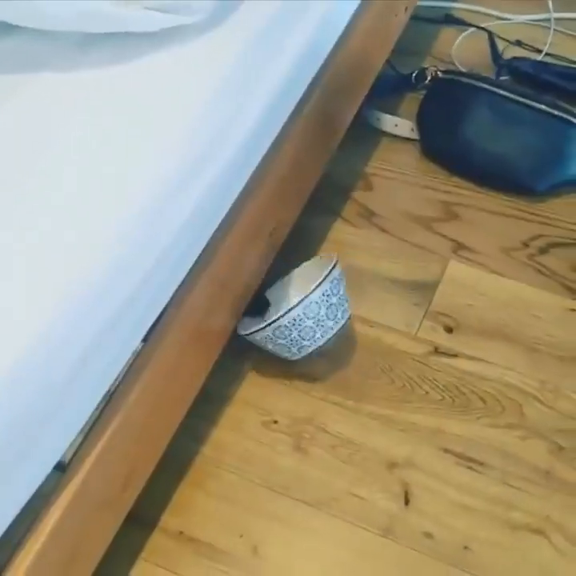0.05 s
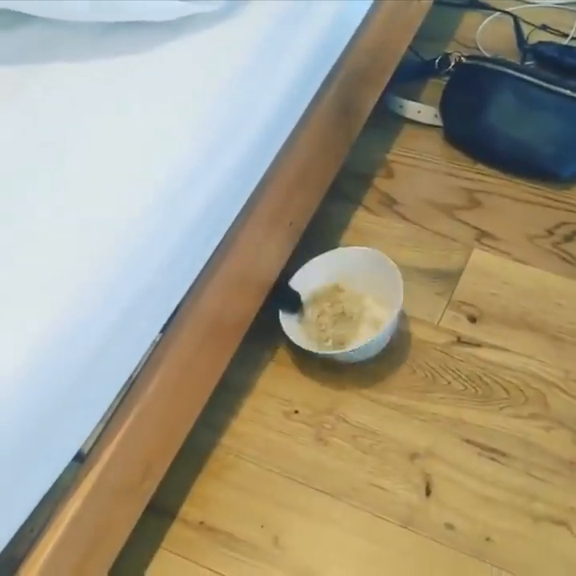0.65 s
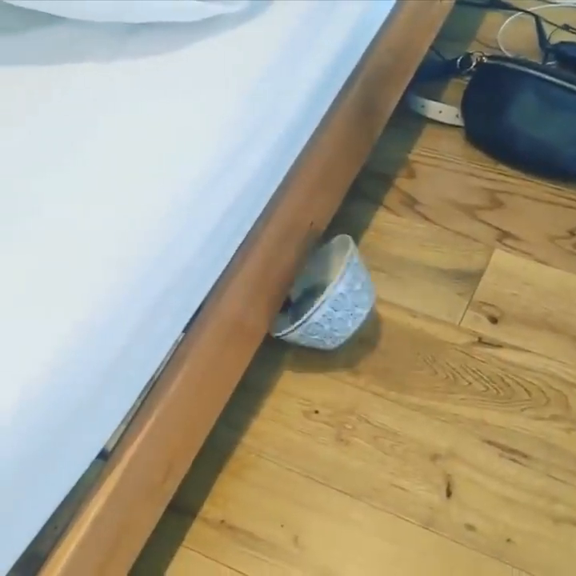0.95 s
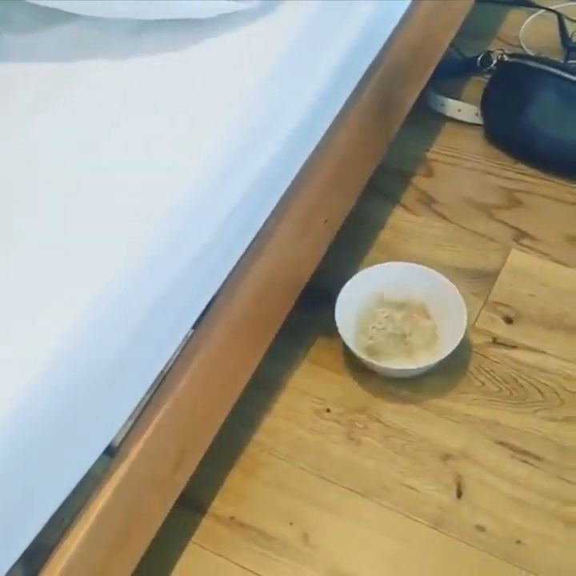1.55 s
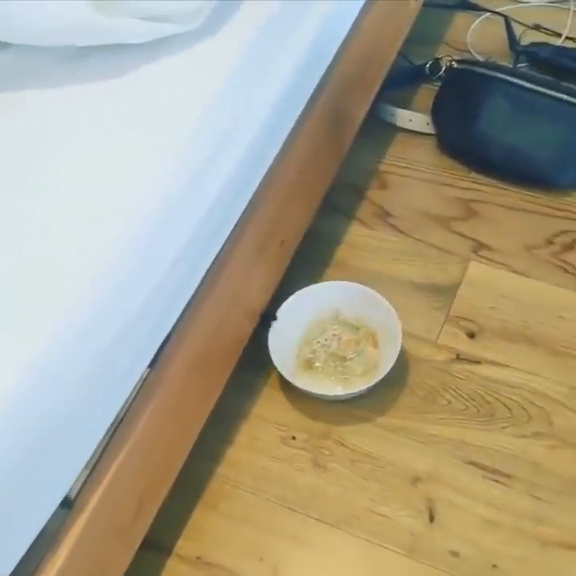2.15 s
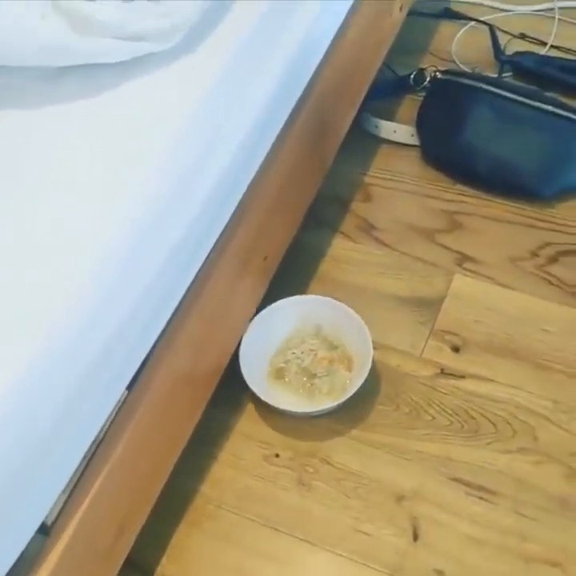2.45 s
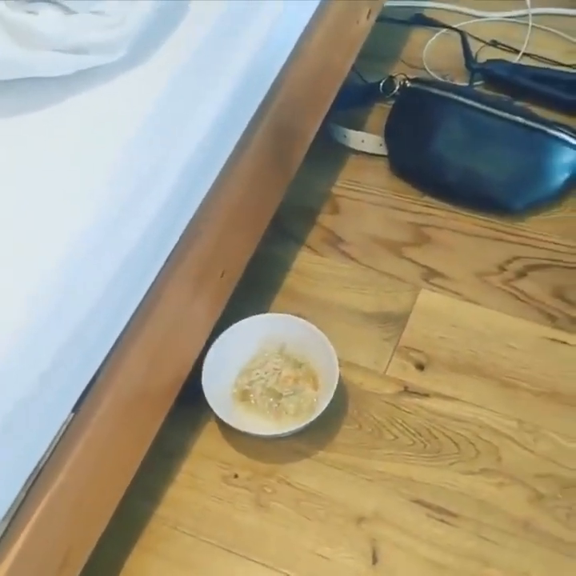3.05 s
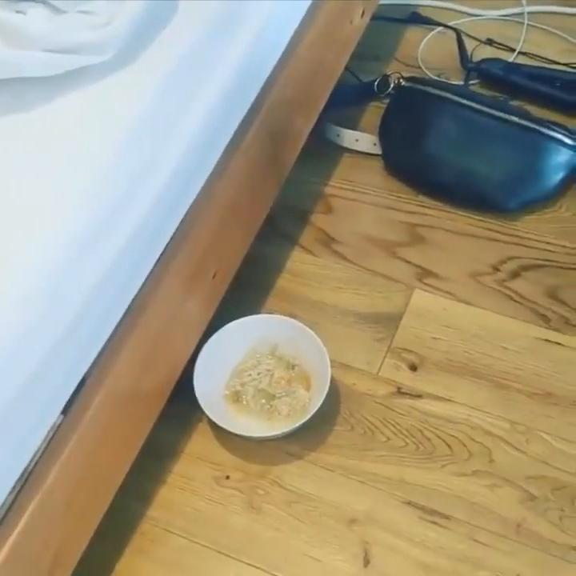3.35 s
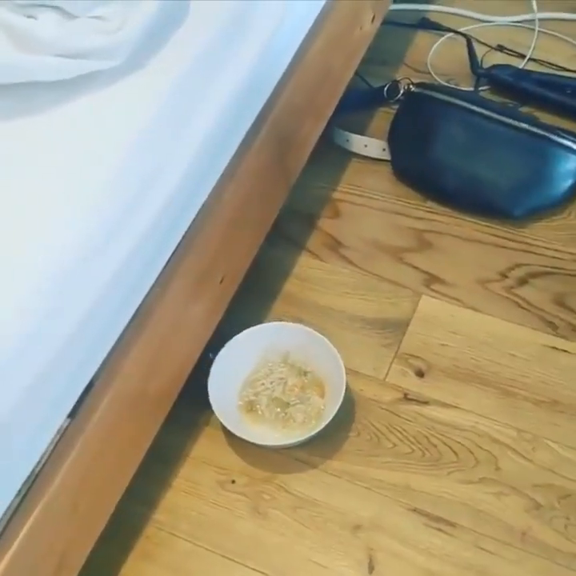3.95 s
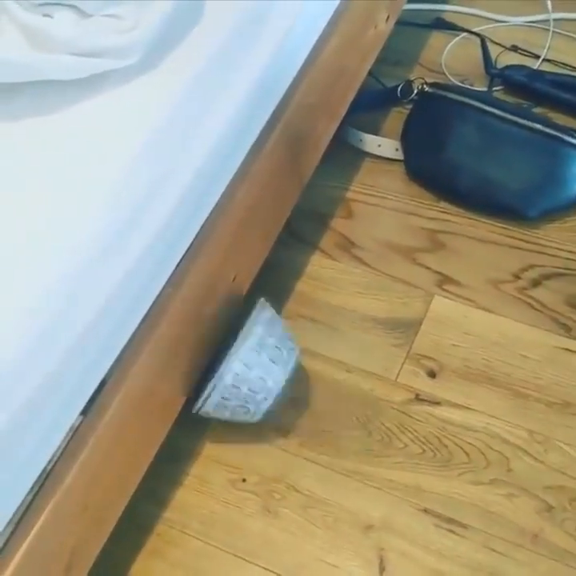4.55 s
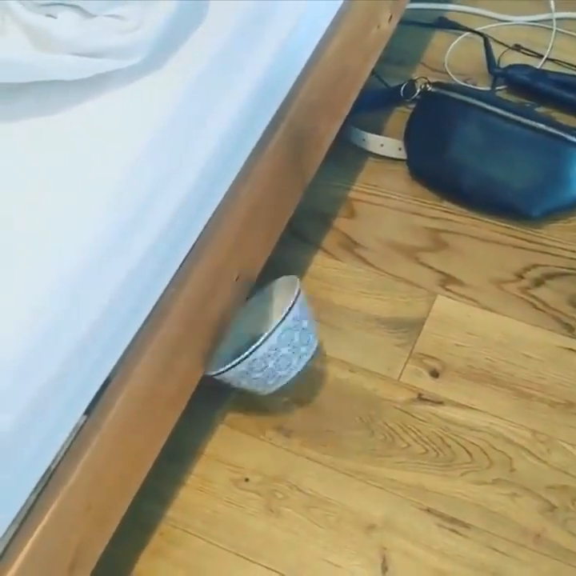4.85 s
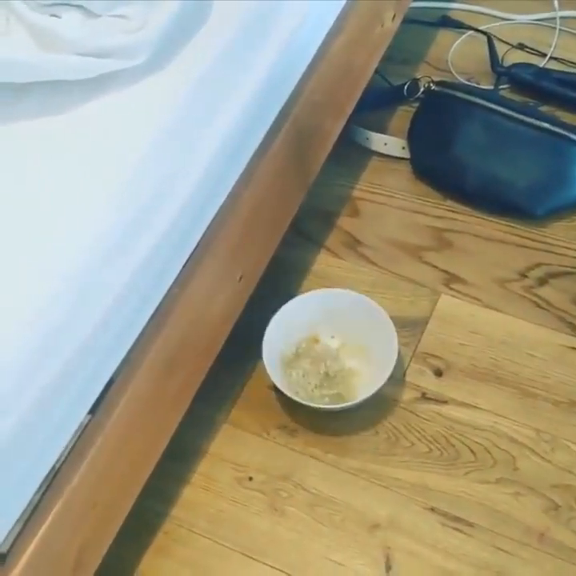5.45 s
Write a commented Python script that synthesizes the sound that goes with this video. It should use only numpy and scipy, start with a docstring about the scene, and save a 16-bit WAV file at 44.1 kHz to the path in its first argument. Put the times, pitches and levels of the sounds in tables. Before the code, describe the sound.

A ceramic bowl is tugged about on a wooden floor, knocking, ringing briefly and scraping in short irregular strokes.

```python
"""A light knock and a scrape: a ceramic bowl of dry food is tugged about on a wooden bedroom floor.
It tips and drops back beside the bed frame. Each knock thumps the boards, clacks the foot and rings
the glazed wall, which chatters as it settles; after the hardest landings the rim bounces in light taps.
Between knocks the foot grinds over the grain while glaze and food hiss and scuff.
Underneath lies a bed of room tone: soft air, a slowly swelling rumble and a faint appliance hum."""
import sys
import numpy as np
from scipy import signal
from scipy.fft import rfft, irfft
from scipy.io import wavfile
from scipy.ndimage import uniform_filter1d

SR = 44100
rng = np.random.default_rng(int(sys.argv[2]) if len(sys.argv) > 2 else 0)


def store_pcm(level_fs):
    """Save levels as 16-bit WAV."""
    pcm = np.round(np.clip(level_fs, -1, 1) * 32767).astype(np.int16)
    wavfile.write(sys.argv[1], SR, np.atleast_2d(pcm).T)


N = 250929
TIME = np.arange(N) / SR
RING = np.arange(SR * 4 // 7) / SR  # time axis of a one-shot and its tail

# Cue levels and spectra are relative; each layer gets its trim in the mix.
# knock cues: t/s, strength/dB, extra wall ring from an edge hit/dB, glaze tick against the ring/dB,
# contact resonance f/Hz, its level against the clack/dB, favoured wall note f/Hz,
# its level against the ring/dB, ceiling echo/dB, chatter time/s, extra board thump/dB
KNOCK_CUES = [(0.002, -32.5, 9, 0.5, 336, -14, 4220, -17, 4, 0.0014, 3.5),
              (0.083, -35, -6, 13, 166, 8, 4060, -5, 1, 0.0039, 0),
              (0.333, -30, -3, -7.5, 697, -0.5, 4100, -6, 7.5, 0.0061, 1.5),
              (0.978, -29, 13, -2.5, 380, -11, 3800, -17, 15, 0.0033, 4.5),
              (0.997, -21, 6, -2, 685, -2, 3024, 2, 13, 0.002, 1),
              (1.006, -22.5, 7, -1, 681, 0.5, 3960, 3.5, 9, 0.005, -3),
              (1.021, -25, 6.5, 4, 656, 2, 4030, -1, -4.5, 0.0059, 1.5),
              (1.317, -25.5, 1, -8, 673, -4, 2090, 4, 10, 0.0065, -2),
              (1.3277, -17, -5, -7.5, 1380, -4.5, 2200, -9, 10, 0.002, -5),
              (1.458, -30.5, -6, -18, 403, -3, 3600, -5, 14, 0.0063, 2.5),
              (1.652, -27.5, -3, -3, 385, -5, 3620, 4.5, 11, 0.0032, 2.5),
              (1.678, -29.5, 0, -18, 408, -12, 3560, 10, -4, 0.0027, -4),
              (1.741, -31, 8, -1.5, 664, -13, 3940, -2, 11, 0.0017, 3),
              (1.749, -21.5, 1, -19, 1507, -2.5, 3480, -1.5, 15, 0.0014, -2),
              (1.8136, -16, 0, -15, 992, -10, 3400, -5.5, 6, 0.0013, -3.5),
              (1.821, -24, 11, -17, 1520, 1, 4150, 2, 0, 0.0013, 0.5),
              (1.856, -22.5, 0, -9, 650, -9, 3580, 0.5, 4, 0.001, -0.5),
              (2.433, -43.5, -7, -1, 440, -2, 4400, -6, 3, 0.0008, -9.5),
              (2.521, -15, 5, -4, 667, -2.5, 4210, -6, 14, 0.0008, -5),
              (2.5237, -12, -0.5, -4.5, 1084, -14, 4320, -5, 7.5, 0.00093, -2.5),
              (2.567, -22, 3.5, -11, 1030, -14, 4560, -4, 5, 0.0013, 1.5),
              (3.817, -39.5, -7, -12, 370, 3, 3950, -10, 10, 0.0013, 4.5),
              (3.83, -36, -5, -18, 402, -6, 3900, -5, 11, 0.003, -8),
              (4.041, -42.5, 6.5, 2.5, 365, 2.5, 3950, -11, 12, 0.0077, -5),
              (4.716, -38, 4, -2, 406, -1, 3900, -17, 7, 0.0044, -0.5),
              (4.787, -24.5, 0.5, -26, 696, -4, 3970, 1, 4, 0.0047, 1),
              (4.822, -38, 3, -25, 920, 5, 4070, -9, -2, 0.0029, -4),
              (4.887, -36.5, 3.5, -10, 710, 9.5, 3910, -2, 3, 0.0045, -2.5),
              (5.212, -15.5, 15, -0.5, 663, -8, 5380, -9.5, 7, 0.0013, 0.5),
              (5.2145, -8, 7, -4, 707, -7, 2270, -6, 8, 0.0012, 0.5),
              (5.281, -16, 1, -19, 1240, -6, 4030, -2, 5, 0.0012, -6.5),
              (5.325, -19, -2, -10.5, 546, -6.5, 4600, -8, 8, 0.0043, -8),
              (5.351, -25, 9.5, -13, 940, -20, 4460, -11, 9, 0.0016, -5.5)]
# modes of the bowl's foot on the wood: f/Hz, level/dB, t60/s
FOOT_MODES = [(427, -24.5, 0.23), (549, -5.5, 0.1), (639.5, -1, 0.044), (666, -5, 0.066), (740, -21, 0.085),
              (926, 5.5, 0.032), (1030, -24, 0.027), (1200, -14.5, 0.09), (1415, 0, 0.033),
              (1560, 1, 0.031), (1970, 6, 0.014)]
# spectrum of the crack of ceramic on wood: f/Hz, level/dB
CRACK_EQ = [(120, -11.5), (260, -5), (345, -8.5), (450, -4), (650, -9.5), (1050, 0), (1500, -5), (1800, -9),
            (2200, -6.5), (2700, -11.5), (5000, -16.5), (12500, -33), (14500, -55)]
# floorboard modes: f/Hz, level/dB, t60/s
BOARD_MODES = [(112.5, -11.5, 0.12), (146.7, -0.5, 0.17), (176, -4.5, 0.14), (213, -7.5, 0.097),
               (267.7, 1.5, 0.18), (303.6, 0.5, 0.083), (385.4, -1.5, 0.11)]
# spectrum of the boards' thud: f/Hz, level/dB
THUD_EQ = [(60, -25), (135, 1.5), (250, 0), (345, -12.5), (430, -0.5), (560, -4), (750, -3.5),
           (1500, -41.5)]
# deep sway of the floor on its joists: f/Hz, level/dB, t60/s
JOIST_MODES = [(55, 0, .7)]
# modes of the ceramic wall: f/Hz, level/dB, t60/s
WALL_MODES = [(2313, -6, 0.025), (3080, 2, 0.0096), (3230, -13, 0.044), (3467, 0.5, 0.045),
              (3750, -9.5, 0.062), (3990, -10.5, 0.046), (4450, 1, 0.037), (4600, -28, 0.62),
              (4650, -1, 0.033), (4730, -10.5, 0.06), (5443, -1.5, 0.031), (5650, -4, 0.069),
              (5840, -7, 0.05), (6250, -5, 0.04), (7120, -5.5, 0.035), (7360, -1.5, 0.039),
              (7300, -13, 0.049), (8520, -10.5, 0.02), (9300, -14, 0.05)]
# spectrum of the glaze's chatter: f/Hz, level/dB
CHATTER_EQ = [(1500, -28.5), (2700, -8), (3500, 3), (4400, 3), (5100, -10.5), (5700, 2.5), (6300, -1),
              (6800, -7.5), (7400, -2.5), (8500, -14.5), (12000, -38), (14500, -69)]
# spectrum of the glaze's tick: f/Hz, level/dB
TICK_EQ = [(4000, -18.5), (7000, -17), (8000, 6.5), (8700, -3), (9400, 4), (10500, -6.5), (12000, -5.5),
           (13200, -28), (14300, -66)]
# spectrum of the first touch of glaze on wood: f/Hz, level/dB
BITE_EQ = [(500, -26.5), (1000, -5.5), (1450, 2), (1800, -7.5), (2300, -0.5), (3600, 3.5), (5500, 0),
           (9000, -17), (13000, -21), (14800, -36)]
# drag cues: t/s, length/s, grind level/dB, hiss level/dB
SLIDE_CUES = [(0.0, 0.11, -53.5, -51), (0.939, 0.035, -52, -57.5), (1.014, 0.013, -31.5, -31),
              (1.473, 0.086, -40.5, -61), (1.557, 0.024, -40.5, -60), (1.61, 0.079, -47, -56.5),
              (1.652, 0.016, -40, -58), (2.065, 0.14, -56, -62), (2.228, 0.36, -84, -70),
              (2.504, 0.015, -51, -59), (2.709, 0.036, -45, -60), (2.754, 0.15, -61, -65.5),
              (4.165, 0.081, -58.5, -62.5), (4.58, 0.08, -69.5, -62), (4.739, 0.056, -47.5, -58),
              (5.263, 0.11, -42, -60)]
# resonances shaken by the slipping foot: f/Hz, level/dB, t60/s
JUDDER_MODES = [(264.2, -2.5, 0.1), (297, -1.5, 0.023), (391, 0, 0.094), (638, -5, 0.03),
                (893, -2.5, 0.0321), (1128, -13.5, 0.047)]
# spectrum of the foot grinding over the grain: f/Hz, level/dB
GRIND_EQ = [(90, -21), (170, 1.5), (320, 13), (600, 2.5), (1100, 5), (1700, -7.5), (3000, -71)]
# spectrum of rubbing glaze and dry food: f/Hz, level/dB
HISS_EQ = [(1200, -6), (2500, -6), (3300, 0), (4200, 3), (5100, -5), (6000, 2.5), (8200, -13.5), (9500, -5),
           (10500, -12), (12000, -8), (13100, -18), (14000, -54)]
# spectrum of the room's air: f/Hz, level/dB
AIR_EQ = [(20, -3), (30, -21.5), (42, -0.5), (55, -20.5), (75, -1), (140, -19.5), (220, -15), (400, -18),
          (750, -23), (1500, -33), (4000, -37.5), (9000, -41), (13000, -52), (14200, -87.5)]
# spectrum of the low rumble: f/Hz, level/dB
RUMBLE_EQ = [(15, 4), (27, 17.5), (40, -24), (55, -2), (75, -10.5), (150, -57.5)]
# fader ride of the rumble: t/s, level/dB
RUMBLE_RIDE = [(0.0, -69), (1.9, -65.5), (2.4, -49), (2.95, -61.5), (4.05, -49), (4.45, -52.5),
               (5.3, -51.5)]
# partials of the appliance hum: f/Hz, level/dB
HUM_PARTIALS = [(102.3, -61.5), (209.9, -81.5), (403.7, -75), (597.5, -89)]
# cues for scuffs of glaze and food: t/s, level/dB, fade/s, treble tilt/(dB per octave)
SCUFF_CUES = [(0.057, -42, 0.01, -4), (1.576, -51.5, 0.016, 8), (1.686, -45, 0.0059, -11),
              (2.316, -53, 0.017, 0.5), (2.372, -59, .01, 6), (2.428, -50.5, 0.011, 1.5),
              (2.479, -40.5, 0.018, 6), (2.676, -38.5, 0.0088, 3), (2.687, -45.5, 0.0035, 2),
              (3.03, -57, 0.023, -4), (3.77, -45.5, 0.0095, -2), (3.979, -50, 0.015, 0),
              (4.148, -53.5, 0.013, -1), (4.773, -37.5, 0.009, -7.5)]
# cues for bounces of the rim: t/s, level/dB
TAP_CUES = [(1.847, -28), (1.869, -32), (2.544, -25), (2.559, -22.5), (2.584, -33.5), (5.293, -21.5),
            (5.302, -27.5), (5.339, -22.5), (5.36, -28), (5.372, -40)]
# reverb time of the bedroom: f/Hz, t60/s
ROOM_DECAY = [(100, 0.42), (400, 0.33), (1200, 0.28), (4000, 0.3), (8000, 0.31), (13000, 0.19)]


def undb(db):
    """Decibels to gain."""
    return 10 ** (np.asarray(db) / 20)


def unit(x):
    """Scale to an energy of one per channel."""
    return x / np.sqrt(np.mean(np.sum(x ** 2, axis=-1)))


def level(x, db):
    """Scale to an rms level."""
    return x * undb(db) / np.sqrt(np.mean(x ** 2))


def burst(x, db):
    """Scale a one-shot so that its first 30 ms have this rms level."""
    return x * undb(db) / np.sqrt(np.mean(x[..., :SR * 3 // 100] ** 2))


def pan_left(db):
    """Stereo gains: left up and right down by db."""
    return undb([[db], [-db]])


def add(out, s, x):
    """Mix a one-shot in at time s."""
    start = max(int(s * SR), 0)
    out[:, start:start + x.shape[-1]] += x[:, :N - start]


def freqs(n):
    """Bin frequencies of a transform of n samples."""
    return np.arange(n // 2 + 1) * SR / n


def through(x, response):
    """Pass a sound through an impulse response, keeping its length."""
    return signal.fftconvolve(np.atleast_2d(x), np.atleast_2d(response), axes=-1)[:, :np.shape(x)[-1]]


def lowpass(x, hz):
    """Roll off the top at 12 dB per octave."""
    return signal.sosfilt(signal.butter(2, hz, fs=SR, output="sos"), x)


def colour(x, points, size=2048):
    """Minimum-phase EQ through (f/Hz, level/dB) points on a log-frequency axis."""
    hz, db = np.transpose(points)
    curve_db = np.interp(np.log(freqs(size) + 1), np.log(hz), db)
    cepstrum = irfft(np.log(undb(curve_db)))
    cepstrum[1:size // 2] *= 2
    cepstrum[size // 2 + 1:] = 0
    return through(x, irfft(np.exp(rfft(cepstrum))))


def even(x, width_hz):
    """Flatten the broad peaks and dips of a random response, keeping its fine grain."""
    power = np.mean(np.abs(rfft(np.atleast_2d(x))) ** 2, axis=0)
    power = uniform_filter1d(power, int(width_hz * len(RING) / SR) + 1)
    gain_db = -10 * np.log10(power / power.mean() + 1e-9)
    return colour(x, np.transpose([freqs(len(RING)) + 1, gain_db]))


def diffuse(n, merge_hz):
    """Stereo noise: centred in the bass, wide in the treble."""
    mid, side = rng.standard_normal((2, n))
    side = .9 * signal.sosfilt(signal.butter(1, merge_hz, "high", fs=SR, output="sos"), side)
    return np.array([mid + side, mid - side]) / np.sqrt(2)


def modes(table, scatter_db):
    """Damped ringing; every contact point weights and detunes the modes a little differently."""
    hz, db, t60 = np.transpose(table)[:, :, None]
    size, tune, polarity = rng.standard_normal((len(table), 3)).T[:, :, None]
    fade = np.sign(polarity) * undb(db + scatter_db * size) * np.exp(-np.log(1000) * RING / t60)
    return unit(np.sum(fade * np.sin(2 * np.pi * hz * (1 + 0.0033 * tune) * RING), axis=0))


def crunch(points, decay_s):
    """The dense, quickly damped vibration round a contact."""
    noise = rng.standard_normal(len(RING)) * np.exp(-RING / decay_s)
    return unit(colour(even(noise, width_hz=350), points))


def grains(n, per_s, spread_db):
    """Tiny random contacts of uneven size."""
    chance, size = rng.random(n), rng.standard_normal(n)
    return (chance < per_s / SR) * np.sign(rng.standard_normal(n)) * undb(spread_db * size)


def pulse_train(per_s, uneven, spread_db, count=1500):
    """A loosely regular run of contacts, each with its own gap and size."""
    gap, size = rng.standard_normal((count, 2)).T
    at = (np.cumsum(np.exp(uneven * gap)) / per_s * SR).astype(int)
    return np.bincount(at[at < N], undb(spread_db * size)[at < N], N)


def room(tail_db, early_db, early_s, early_decay_s, merge_hz):
    """Direct sound, a cluster of early reflections and a tail that dulls as it fades."""
    spectrum = rfft(diffuse(len(RING), merge_hz))
    log_hz, centres = np.log(freqs(len(RING)) + 1), np.log([hz for hz, _ in ROOM_DECAY])
    tail = np.zeros((2, len(RING)))
    for weights, (_, t60) in zip(np.eye(len(centres)), ROOM_DECAY):
        band = irfft(spectrum * np.interp(log_hz, centres, weights), len(RING))
        tail += band * np.exp(-np.log(1000) * RING / t60)
    tail *= 1 - np.exp(-RING / 0.0026)
    slope_s = np.where(RING > early_s, early_decay_s, .003)
    early = diffuse(len(RING), merge_hz) * np.exp(-np.abs(RING - early_s) / slope_s)
    response = undb(tail_db) * unit(tail) + undb(early_db) * unit(early)
    response[:, 0] += 1  # direct sound
    return even(response, width_hz=630)


def wood_room():
    """The driest space, for the boards and the foot."""
    return room(tail_db=1.0, early_db=-1.5, early_s=0.0012, early_decay_s=0.0089, merge_hz=520)


def bowl_room(ceiling_db):
    """The open bowl throws its treble at the ceiling, which returns it 9 ms later."""
    return room(tail_db=ceiling_db - 3, early_db=ceiling_db, early_s=.009, early_decay_s=.009,
                merge_hz=914)


def near_room():
    """Mostly first reflections, off the floor and the bed frame."""
    return room(tail_db=4.0, early_db=8.5, early_s=0.0022, early_decay_s=0.0069, merge_hz=1096)


def floor_knock(strength_db, boards_db, contact_hz, contact_db, chatter_s):
    """The body of a knock: the foot clacks, the boards thump and hard landings sway the joists."""
    space = wood_room()
    # a rolling contact builds up and lasts longer than a clean hit
    attack = 1 - np.exp(-(RING / (.5 * chatter_s)) ** 2)
    foot = unit(modes(FOOT_MODES, scatter_db=1.5) * attack)
    crack = unit(crunch(CRACK_EQ, decay_s=1.86 * chatter_s) * attack)
    # a softer contact pushes for longer and leaves out the upper modes
    corner_hz = np.clip(1100 * 2 ** ((strength_db + 28.5) / 13), 400, 6000)
    clack = unit(lowpass(foot + undb(4.0) * crack, corner_hz))
    # the bowl bounces on the springy wood for 36 cycles, pitched by the spot that touches
    bounce = modes([(contact_hz, 0, 36 / contact_hz)], scatter_db=0)
    clack += undb(contact_db) * unit(bounce * attack)
    thump = (modes(BOARD_MODES, scatter_db=3.5) + undb(-5.5) * crunch(THUD_EQ, decay_s=0.0084)) * attack
    thump_db = -24 + 0.72 * strength_db + boards_db  # yielding boards: grows more slowly than the blow
    return (burst(through(clack, space), strength_db - 12.5) * pan_left(1.7)
            + burst(through(thump, space), thump_db) * pan_left(.9)
            + burst(modes(JOIST_MODES, scatter_db=0), -24.5 + 1.42 * strength_db))


def bowl_ring(ring_db, note_hz, note_db, tick_db, ceiling_db, chatter_s):
    """A run of tiny bounces rings the ceramic wall, favouring one note, and ticks on the glaze."""
    space = bowl_room(ceiling_db)
    attack = 1 - np.exp(-RING / 0.0031)
    chatter = grains(len(RING), per_s=11000, spread_db=3.5) * np.exp(-RING / (1.08 * chatter_s)) * attack
    # a soft touch stays in contact and damps the wall; a hard one bounces free and rings on
    free_s = 0.015 * 2 ** ((ring_db + 64.5) / 10)
    wall = unit(modes(WALL_MODES, scatter_db=5.0) * np.exp(-RING / free_s) * attack)
    ring = wall + undb(-0.5) * unit(colour(chatter, CHATTER_EQ))
    note = modes([(note_hz, 0, 0.04)], scatter_db=0)
    return (burst(through(note, near_room()), ring_db + note_db - 3.5)
            + burst(through(ring, space), ring_db - 1.0)
            + burst(through(colour(chatter, TICK_EQ), space), ring_db + tick_db - 4.5))


def bite(db, decay_s=.0014):
    """The transient of a knock: glaze cracks against wood, the louder the brighter."""
    crack = crunch(BITE_EQ, decay_s) * (1 - np.exp(-(RING / decay_s) ** 2))
    corner_hz = np.clip(9000 * 2 ** ((db + 25.5) / 11), 2500, 18000)
    return burst(through(lowpass(crack, corner_hz), near_room()), db)


def knocks():
    """Each knock stacks floor, bowl and bite; harder blows and blows on the edge are brighter."""
    out = np.zeros((2, N))
    for (s, strength_db, edge_db, tick_db, contact_hz, contact_db,
         note_hz, note_db, ceiling_db, chatter_s, boards_db) in KNOCK_CUES:
        chatter_s = max(chatter_s, .001)
        ring_db = -11.5 + 1.456 * strength_db + edge_db  # the stiff wall wakes faster than the blow
        add(out, s, floor_knock(strength_db, boards_db, contact_hz, contact_db, chatter_s))
        add(out, s, bowl_ring(ring_db, note_hz, note_db, tick_db, ceiling_db, chatter_s))
        add(out, s, bite(-6 + 1.516 * strength_db - ceiling_db))
    return out


def stroke(s, length, attack_s=0.014, release_s=0.018):
    """Speed of a drag: it gets going, holds and dies away."""
    return np.clip((TIME - s) / attack_s, 0, 1) * np.exp(-np.maximum(TIME - s - length, 0) / release_s)


def rubbing(catches):
    """Tiny catches of glaze and dry food hiss and set the wall ringing."""
    ring = through(catches, modes(WALL_MODES[1:], scatter_db=4.0))
    return level(colour(catches, HISS_EQ), 0) + level(ring, -10.5)


def slides():
    """The foot sticks, slips and bumps over the wood grain while glaze and dry food hiss along."""
    grind_gain, hiss_gain = np.zeros((2, N))
    for s, length, grind_db, hiss_db in SLIDE_CUES:
        speed = stroke(s, length)
        grind_gain += speed * undb(grind_db)
        hiss_gain += speed * undb(hiss_db)
    slips = pulse_train(per_s=44, uneven=.33, spread_db=5.5)
    judder = through(slips, modes(JUDDER_MODES, scatter_db=-2.0))
    bumps = pulse_train(per_s=110, uneven=.45, spread_db=2.0)
    grind = level(colour(bumps, GRIND_EQ), -4.5) + level(judder, -3)
    hiss = rubbing(grains(N, per_s=290, spread_db=3.5))
    return (through(grind * grind_gain, unit(wood_room())) * pan_left(1.2)
            + through(hiss * hiss_gain, unit(bowl_room(ceiling_db=10.5))))


def room_tone():
    """Soft air, a low rumble that swells slowly and the wavering hum of an appliance."""
    knots_s = np.arange(0, 7, 1 / 4)
    waver = np.interp(TIME, knots_s, rng.standard_normal(len(knots_s)))
    air = level(colour(diffuse(N, merge_hz=500), AIR_EQ), -57.5)
    swell = undb(np.interp(TIME, *np.transpose(RUMBLE_RIDE)))
    rumble = level(colour(rng.standard_normal(N), RUMBLE_EQ, size=8192), 0) * swell
    hum = sum(undb(db + 1.8 * waver) * np.sqrt(2) * np.sin(2 * np.pi * hz * TIME + 0.95 * waver)
              for hz, db in HUM_PARTIALS)
    return air + rumble + hum


def scuffs(attack_s=0.003):
    """Glaze and food rub in quick, fading runs of catches, each with its own treble tilt."""
    out = np.zeros((2, N))
    hz = freqs(len(RING))
    octaves = np.log2(np.clip(hz, 3000, 13000) / 6000)
    for s, db, fade_s, tilt_db in SCUFF_CUES:
        envelope = np.exp(-RING / fade_s) * (1 - np.exp(-RING / attack_s))
        catches = grains(len(RING), per_s=1500, spread_db=5.0) * envelope
        scuff = colour(rubbing(catches), np.transpose([hz + 1, tilt_db * octaves]))
        add(out, s, burst(through(scuff, bowl_room(ceiling_db=6.5)), db - 9.0))
    return out


def rim_taps():
    """Light, separate bounces of the rim on the wood after a hard landing."""
    out = np.zeros((2, N))
    for s, db in TAP_CUES:
        tap = lowpass(crunch(CRACK_EQ, decay_s=0.0016), hz=1830)
        add(out, s, burst(through(tap, wood_room()), db - 12.5) * pan_left(1.4))
    return out


def scene():
    """Knocks, rim taps, scuffs and slides over the room tone."""
    return knocks() + rim_taps() + scuffs() + slides() + room_tone()


def record(dry):
    """Master chain: clip at full scale, then cut steeply above 14.8 kHz."""
    return signal.sosfilt(signal.ellip(8, .2, 70, 14800, fs=SR, output="sos"), np.clip(dry, -1, 1))


dry = scene()
out = record(dry)
store_pcm(out)
```